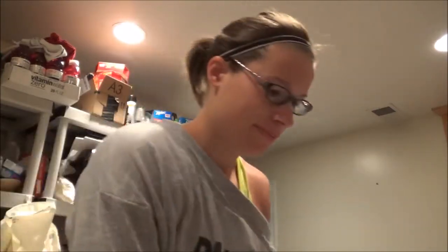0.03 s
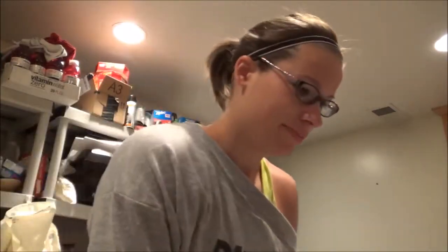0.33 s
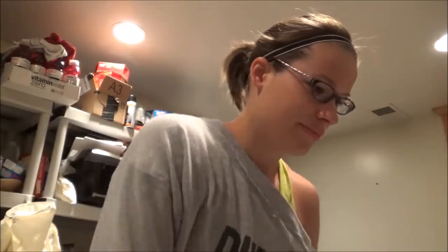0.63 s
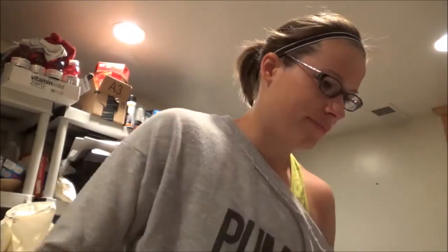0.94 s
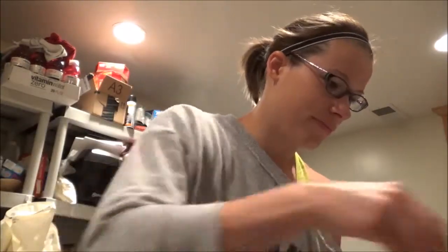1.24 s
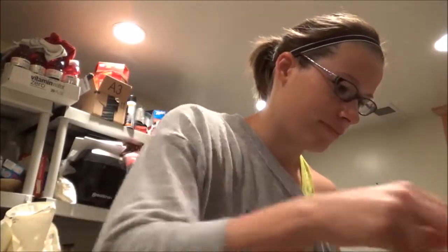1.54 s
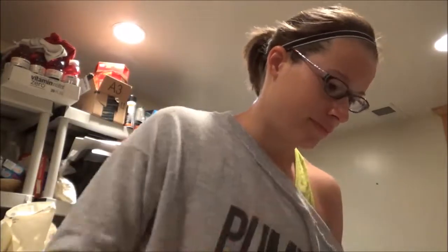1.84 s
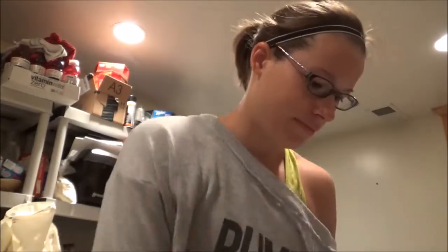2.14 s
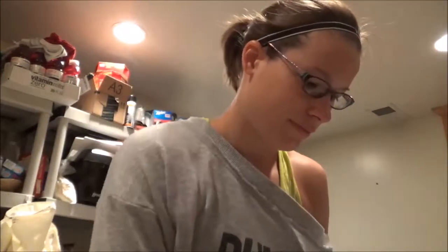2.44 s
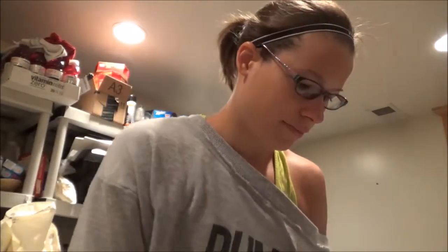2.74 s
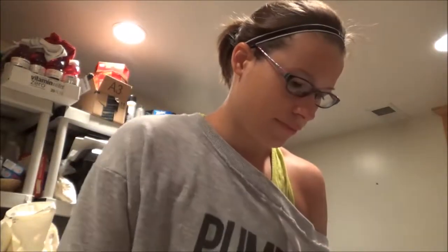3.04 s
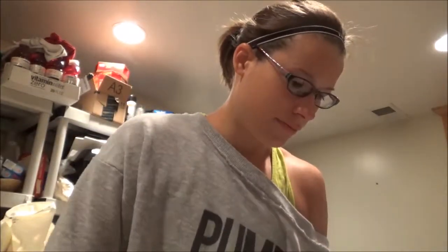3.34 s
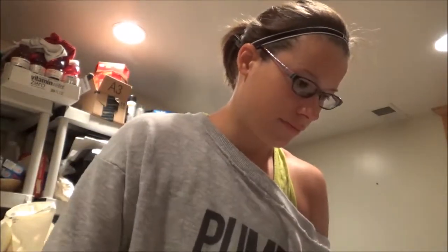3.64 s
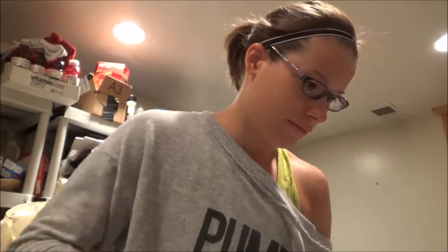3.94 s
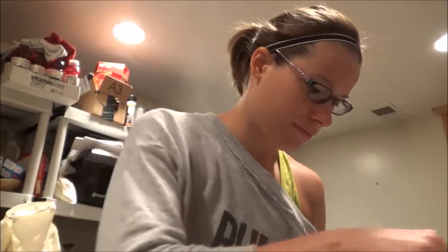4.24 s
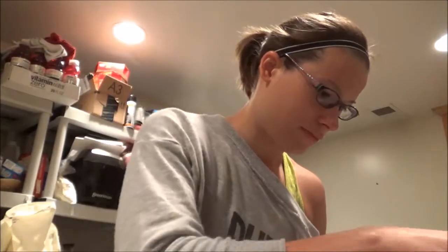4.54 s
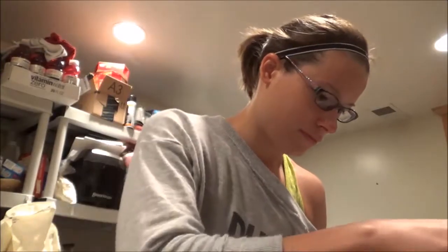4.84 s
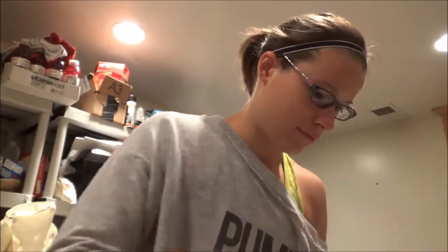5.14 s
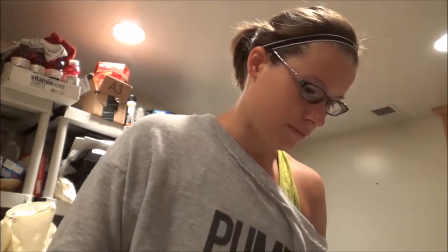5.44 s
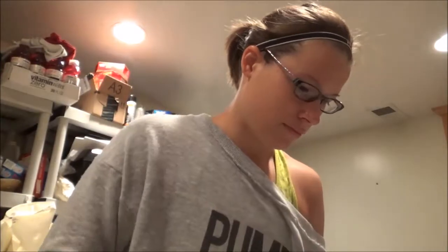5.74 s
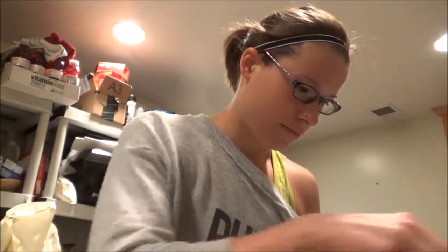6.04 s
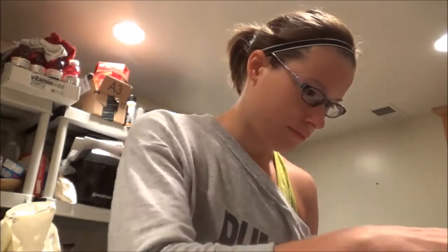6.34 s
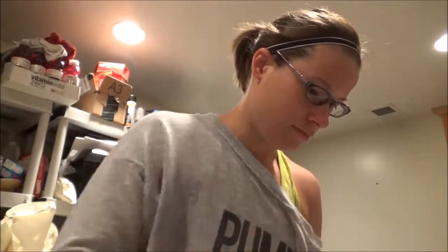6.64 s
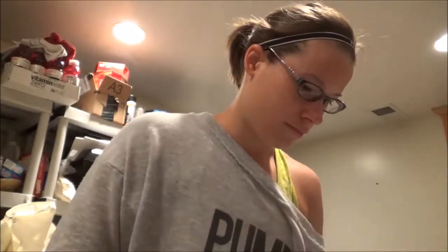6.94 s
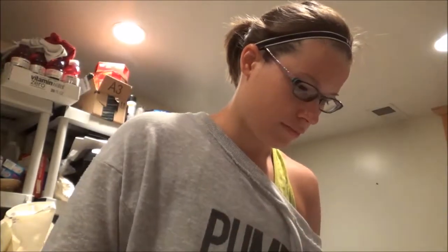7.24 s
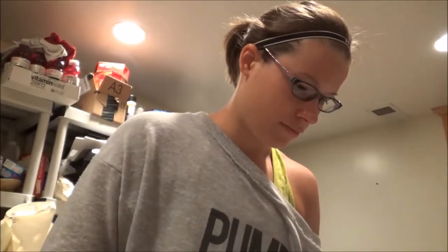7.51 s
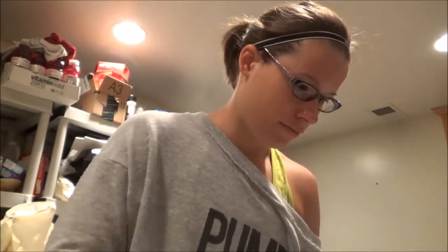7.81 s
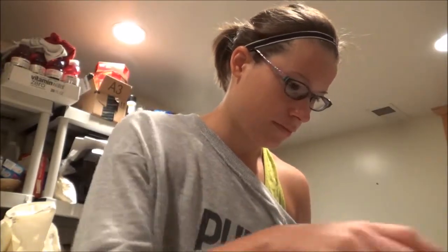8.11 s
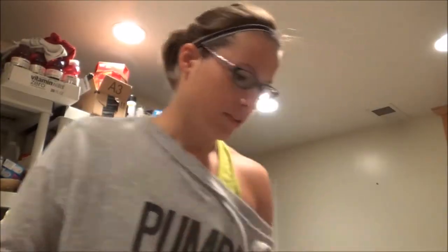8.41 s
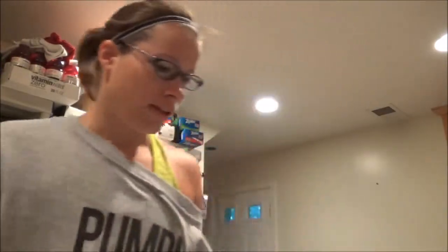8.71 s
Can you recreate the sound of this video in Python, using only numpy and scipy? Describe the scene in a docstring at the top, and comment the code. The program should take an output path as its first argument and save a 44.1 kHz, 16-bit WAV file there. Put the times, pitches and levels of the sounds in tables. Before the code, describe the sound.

Over the steady low hum of a small kitchen, someone handles a plastic bag close by in two bursts of sharp crinkling, with a short patter of hard pieces landing in a spoon between them. A quieter stretch follows with only scattered, dry ticks of single pieces falling. At the end the bag rustles up again. Counter and walls add a short echo.

```python
"""Chocolate chips are shaken from a plastic bag into a measuring spoon in a small, humming kitchen.
First the bag crinkles close by, its creases snapping over a bed of tiny crackles; then a few chips tick
and bounce. Near 2 s the bag is gripped hard again and film hisses over film, with a few soft bumps.
From 4 s stray chips drop, and just after 8 s the bag crackles as it is picked up again.
Counter and walls add a short echo to the handling."""
import sys
import numpy as np
from scipy import signal
from scipy.fft import rfft, irfft, next_fast_len
from scipy.io import wavfile

SR = 44100
rng = np.random.default_rng(int(sys.argv[2]) if len(sys.argv) > 2 else 0)


def persist_wave(psi):
    """Save psi, clipped to +-1, as 16-bit WAV."""
    counts = np.round(np.clip(psi, -1, 1) * 32767).astype(np.int16)
    wavfile.write(sys.argv[1], SR, np.atleast_2d(counts).T)


N = 391166
TIME, HIT_TIME = np.arange(N) / SR, np.arange(6144) / SR  # clocks of the scene and of one hit
BODY_HZ, MIDDLE_HZ, TREBLE_HZ = (315, 977), (963, 3960), (3730, 10780)  # the three bands of a hit
LIFT_S = 8.6  # from here on the bag is held up and sounds thinner

# strokes of film sliding over film: start/s, length/s, level/dB
SLIDE_STROKES = [(0.393, 0.049, -44), (0.496, .29, -48.5), (0.848, 0.062, -53), (1.867, 0.056, -43),
                 (2.658, 0.27, -49), (3.071, .11, -50.5), (3.163, 0.21, -55), (3.473, 0.18, -63.5),
                 (3.632, 0.2, -56), (3.742, 0.041, -50.5), (8.385, 0.3, -52), (8.651, 0.23, -47.5)]


def undb(db):
    """Decibels to gain."""
    return 10 ** (np.asarray(db) / 20)


def unit(x):
    """Scale to rms 1."""
    return x / np.sqrt(np.mean(x ** 2))


def band(x, lo_hz, hi_hz, order=2):
    """Causal band-pass."""
    return signal.sosfilt(signal.butter(order, [lo_hz, hi_hz], "band", fs=SR, output="sos"), x)


def spectrum(points, hz):
    """Gain at hz of a curve of (f/Hz, level/dB) points."""
    f, db = np.transpose(points)
    return undb(np.interp(np.log(hz + 1), np.log(f), db))


def noise(gain):
    """Noise of rms 1 whose spectrum is gain(hz)."""
    size = next_fast_len(N)
    hz = np.arange(size // 2 + 1) * SR / size
    return unit(irfft(rfft(rng.standard_normal(size)) * gain(hz), size)[:N])


def add(track, s, x):
    """Mix x into the track at time s."""
    i = int(np.clip(s * SR, 0, N - 1))
    track[i:i + len(x)] += x[:N - i]


def fade(t60):
    """Exponential decay of one hit."""
    return undb(-60 * HIT_TIME / t60)


def ring(hz, t60):
    """One struck mode."""
    return np.sin(2 * np.pi * hz * HIT_TIME) * fade(t60)


def crack(edges_hz, t60, focus_hz=None, focus=2.2, rise_s=0.00028):
    """Crowded, damped modes of one band, strongest near focus_hz; rms near 1 over the first 4 ms."""
    shape = fade(t60) * (1 - np.exp(-HIT_TIME / rise_s))  # soft material takes a moment to give way
    burst = band(rng.standard_normal(len(shape)) * shape, *edges_hz, order=3)
    if focus_hz:
        burst = burst + focus * signal.lfilter(*signal.iirpeak(focus_hz, 2.6, fs=SR), burst)
    return unit(burst) * np.sqrt(np.mean(shape ** 2) / np.mean(shape[:SR // 250] ** 2))


def pop(hz, t60, tone, hold):
    """A small panel flexes once: one heavily damped tone amid a crack of other modes."""
    mode = ring(hz * (1 + 0.01 * rng.standard_normal()), t60 * hold)
    mode /= np.sqrt(np.mean(mode[:SR // 250] ** 2))
    return (tone * band(mode, *MIDDLE_HZ) + crack(MIDDLE_HZ, t60, hz, focus=2.0)) / np.hypot(tone, 1)


def appliances(air_db=-58, side_db=-14, waver=0.35):
    """Room tone: fan air, droning resonances and a wavering motor; only the air has stereo width."""
    # colour of the fan air: f/Hz, relative density/dB
    air_colour = [(15, -36), (27, -23), (55, -3), (110, -5), (200, -9), (250, -11), (330, -5), (430, -12),
                  (560, -16), (750, -19.5), (1060, -22), (1500, -28), (3000, -32.5), (9000, -38.5),
                  (11000, -39.5)]
    # room resonances that the appliances keep going: f/Hz, width/Hz, level/dB
    room_modes = [(34.2, 3, -71), (138.2, 9.2, -59), (174.6, 3.3, -68.5), (297, 11.8, -65),
                  (353.3, 4.3, -64), (476.3, 20, -69), (1035, 30, -81)]
    # course of the low motor hum: t/s, f/Hz, level/dB
    motor_course = [(0, 88.8, -58), (1, 87.8, -60), (3, 85.7, -61), (4.3, 85, -66.5), (5.3, 79.5, -82),
                    (5.9, 79.3, -65), (7.3, 79.1, -68), (8.87, 79.2, -62)]
    air = noise(lambda f: spectrum(air_colour, f))
    side = undb(side_db) * noise(lambda f: spectrum(air_colour, f) * np.clip(f / 1500, .11, 1))
    drone = sum(undb(db) * noise(lambda f: 1 / (1 + ((f - hz) / width) ** 2))
                for hz, width, db in room_modes)
    s, motor_hz, motor_db = np.transpose(motor_course)
    phase = 2 * np.pi * np.cumsum(np.interp(TIME, s, motor_hz)) / SR
    sway = 1 + waver * noise(lambda f: 1 / (1 + (f / 5) ** 2))
    hum = np.sqrt(2) * undb(np.interp(TIME, s, motor_db)) * sway * np.sin(phase)
    return drone + hum + undb(air_db) * (air + np.array([[1], [-1]]) * side)


def bumps(push_s=0.0038):
    """A soft contact swells for a moment and leaves one dull tone; the lowest booms on in the room."""
    # bumps of the bag and its load: t/s, level/dB, f/Hz, t60/s
    contacts = [(.226, -34, 726, 0.11), (1.947, -32, 495, 0.029), (3.248, -31, 510, 0.018),
                (3.413, -39.5, 466, 0.035), (3.473, -43, 580, 0.068), (3.852, -28.5, 556, 0.023),
                (3.84, -51.5, 136.4, 0.61)]
    swell = 1 - np.exp(-HIT_TIME / push_s)
    out = np.zeros(N)
    for s, db, hz, t60 in contacts:
        add(out, s, 2 * undb(db) * swell * ring(hz, t60))
    return out


def chips(t60=0.026, knock_db=-2.5):
    """Each chip gives a dry two-toned knock and rings the spoon's dish, depending on where it lands."""
    # chips landing: t/s, level/dB, relative treble/dB, knock f/Hz, relative dish ring/dB
    landings = [(1.2607, -45.5, -16, 1950, -45), (1.311, -54, 1.5, 1950, -45), (1.3876, -45, -2, 3600, -14),
                (1.3993, -37.5, 3, 3820, -15), (1.4065, -45, 8, 3500, -8), (1.4141, -42.5, 4.5, 1920, -20),
                (1.462, -47.5, -1, 3540, -6), (1.508, -60, 6.5, 2100, 8), (3.9648, -46, -3.5, 1600, -21),
                (4.339, -46.5, 3.5, 2300, -45), (4.5974, -44.5, 5.5, 1790, -45),
                (4.6003, -46.5, 5, 1870, -45), (5.356, -45, 0, 2200, -45), (5.3699, -41.5, -4.5, 2330, -45),
                (5.371, -45, -6, 1190, -45), (6.2976, -58, -1.5, 1970, -45), (6.8976, -54.5, 3, 1900, -45),
                (6.9166, -60.5, 5.5, 2030, -43), (7.816, -55.5, 4.5, 2000, -45),
                (7.8698, -58.5, 2, 2580, -45), (8.156, -51, -18, 1710, -44)]
    # modes of the dish: f/Hz, level/dB, t60/s
    dish_modes = [(2120, -3, 0.085), (2630, -5, 0.03), (3560, 3, 0.04), (5530, 5.5, 0.043),
                  (8300, -8, 0.043)]
    out = np.zeros(N)
    for s, db, treble_db, hz, ring_db in landings:
        knock = pop(hz, t60, tone=0.6, hold=0.6) + undb(-1) * ring(hz * 0.498, t60)
        knock += undb(-4) * crack(BODY_HZ, t60) + undb(treble_db) * crack(TREBLE_HZ, t60)
        dish = sum(undb(mode_db + 2 * rng.standard_normal()) * ring(mode_hz, mode_t60)
                   for mode_hz, mode_db, mode_t60 in dish_modes)
        add(out, s, undb(db) * (undb(knock_db) * knock + undb(ring_db) * dish))
    return out


def crumpling(swell=0.57):
    """How hard the film is worked: it crumples under each grip, then settles."""
    # the hand grips the bag: start/s, attack/s, level/dB, t60/s
    grips = [(0, 0.0017, -41, 0.63), (.15, 0.045, -43, 1.97), (.36, 0.075, -44.5, 0.12),
             (1.862, 0.11, -38.5, 0.24), (2.03, 0.043, -47, 1.26), (2.15, 0.029, -40, .25),
             (2.24, 0.032, -44.5, 2.4), (3.44, 0.024, -56.5, 0.65), (8.3, 0.66, -52, 3.3)]
    power = 1e-12
    for s, attack_s, db, t60 in grips:
        rise = np.clip((TIME - s) / attack_s, 0, 1) ** swell
        settle = undb(-60 * np.maximum(TIME - s - attack_s, 0) / t60)
        power = power + (undb(db) * rise * settle) ** 2
    return np.sqrt(power)


def sliding(edge_s=0.028):
    """How fast the film slides: each stroke starts, holds and stops."""
    return sum(undb(db) * np.clip(np.minimum(TIME - s, s + length - TIME) / edge_s, 0, 1)
               for s, length, db in SLIDE_STROKES)


def catches(per_stroke=8, level_db=-7, spread_db=2, t60=0.012, edge_hz=7500, octaves=0.74):
    """While it slides, the film catches now and then and lets go with a tiny bright tick."""
    out = np.zeros(N)
    for s, length, db in SLIDE_STROKES:
        for when, size, pitch in rng.random((per_stroke, 3)):
            size_db = -spread_db * np.log(1 - .97 * size)  # many weak ones, few strong
            tick = crack(TREBLE_HZ, t60, edge_hz * 2 ** (octaves * (2 * pitch - 1)))
            add(out, s + when * length, undb(db + level_db + size_db) * tick)
    return out


def rustle(per_s=700, spread_db=3, grain_s=0.0022, octaves=0.92, treble_db=-2.5, slide_body_db=-8,
           lifted_db=-6, lifting_s=0.53):
    """Tiny wrinkles give way at random, each with its own size and pitch; sliding film adds hiss."""
    # colour of the film's crackle: f/Hz, relative density/dB
    film_colour = [(100, 12), (200, 1.5), (320, 6), (520, 8), (780, 2.5), (1300, 4.5), (2200, -2),
                   (3500, -5.5), (5500, -9.5), (8500, -3), (12000, -40)]
    work, speed = crumpling(), sliding()
    centres_hz = 140 * 2 ** (np.arange(14) / 2)  # half-octave bands
    weights = spectrum(film_colour, centres_hz) * np.sqrt(centres_hz)
    weights /= np.linalg.norm(weights[6:10])  # the middle bands set the level
    when, size, pitch = rng.random((int(per_s * N / SR), 3)).T
    strength = undb(-spread_db * np.log(1 - .995 * size))
    wrinkle_hz = centres_hz[0] * (centres_hz[-1] / centres_hz[0]) ** pitch
    lift = np.clip((TIME - LIFT_S) / lifting_s + 1, 0, 1)
    out = np.zeros(N)
    for hz, weight in zip(centres_hz, weights):
        high = np.clip(np.log2(hz / 2600), 0, 1)  # 0 in the lows and mids, 1 in the treble
        share = np.exp(-(np.log2(hz / wrinkle_hz) / octaves) ** 2)
        kicks = np.bincount((when * N).astype(int), strength ** 2 * share, N)
        power = signal.lfilter([1], [1, -np.exp(-1 / (grain_s * SR))], kicks + 1e-12)
        power += high * power.mean()  # even hiss fills the gaps in the treble
        grains = np.sqrt(power) * rng.standard_normal(N)
        grains = unit(band(grains, hz / 2 ** .25, hz * 2 ** .25))
        if hz < BODY_HZ[1]:  # the bag loses body as it is lifted
            grains *= undb(lifted_db * lift)
        envelope = np.hypot(work * undb(treble_db * high), speed * undb(slide_body_db * (1 - high)))
        out += weight * grains * envelope
    return out * undb(0)


def small_creases(count=130, level_db=-4, spread_db=4, centre_hz=1750, octaves=0.4):
    """Lesser creases give way at random, as strongly as the bag is worked; rows for creases()."""
    jitter, size, bright, pitch = rng.random((count, 4)).T
    sample = (np.arange(count) + jitter) / count * (N - 1)
    size_db = -spread_db * np.log(1 - .97 * size)
    db = 20 * np.log10(crumpling()[sample.astype(int)]) + level_db + size_db
    treble_db = -7 + 6 * (2 * bright - 1)
    hz = centre_hz * 2 ** (octaves * (2 * pitch - 1))
    return list(zip(sample / SR, db, treble_db, hz))


def snap(db, treble_db, hz, lifted, t60=0.02, hard_db=-38, thinning=0.48, lifted_db=-6.5):
    """A crease flips and the panel of film beside it rings; lows last longest, hard snaps are thinner."""
    tone = 0.5 * undb(-0.31 * treble_db)  # dull creases belong to slack panels, with a clearer note
    middle = undb(-2) * pop(hz, t60, tone, hold=0.33)
    body_db = -9 - thinning * np.clip(db - hard_db, -10, 20) + lifted_db * lifted
    body = undb(body_db) * crack(BODY_HZ, 2 * t60)
    edge_hz = np.clip(6300 * 2 ** (treble_db / 22), 4500, 9200)  # tight, bright creases ring higher
    edge = undb(treble_db - 1) * crack(TREBLE_HZ, 0.63 * t60, edge_hz, focus=4.2)
    return undb(db) * (body + middle + edge)


def creases(longest_wait_s=0.008, second_db=-8, second_octaves=0.27):
    """Every crease snaps, and a neighbouring panel of another size follows a moment later."""
    # the bag's main creases snapping through: t/s, level/dB, relative treble/dB, film ring f/Hz
    main_creases = [(0.0624, -37, -21, 1170), (0.094, -27, -11, 2160), (0.1552, -35.5, -4, 1230),
                    (0.187, -32.5, -10, 1250), (0.2235, -24, -6.5, 1880), (0.2296, -33, -14, 1400),
                    (0.25, -31, -19, 2460), (0.3017, -35, -15, 2490), (0.3401, -32, -3, 1720),
                    (0.522, -43, -9, 1340), (0.5415, -37, -10, 1750), (0.685, -59.5, 14.5, 1380),
                    (0.843, -48.5, -12, 1090), (0.9325, -53, -11, 2840), (1.0114, -46.5, -19, 1050),
                    (1.869, -50, 0, 1160), (1.887, -32, 0, 2580), (1.927, -28, -4, 1270),
                    (1.9342, -23.5, -2.5, 1750), (1.9396, -23.5, -3.5, 1050), (1.9775, -26, -7, 1960),
                    (1.9969, -27.5, -8, 1920), (2.0096, -29, -6, 2260), (2.0202, -29.5, -16, 1970),
                    (2.0642, -40.5, -6, 1970), (2.1076, -44, -5, 1210), (2.159, -27.5, -18, 1190),
                    (2.1706, -24.5, -6.5, 2440), (2.2204, -31, -4, 1280), (2.253, -21, -10.5, 1400),
                    (2.262, -31.5, 2.5, 1380), (2.3069, -31, -6.5, 1750), (2.3453, -31, -9.5, 2380),
                    (2.5133, -57, -18, 1430), (2.58, -55.5, 7, 1540), (2.665, -35, -28, 2060),
                    (2.842, -35.5, -8, 1780), (2.9121, -42.5, -27, 2050), (2.95, -47.5, -4, 2120),
                    (3.0324, -48, 8, 1190), (3.086, -44, -24, 1670), (3.155, -56, 8, 1130),
                    (3.214, -51, 13.5, 1200), (3.2467, -39, -32, 1510), (3.4509, -41, -22, 1730),
                    (3.4648, -54.5, 17, 1240), (3.647, -37, -14.5, 1880), (3.7052, -33, -14.5, 1980),
                    (3.7988, -44.5, -5.5, 2420), (8.2188, -52, -3.5, 1220), (8.2743, -45, -5.5, 1250),
                    (8.36, -52.5, 3, 2380), (8.377, -61, 12.5, 1133), (8.448, -44.5, -10, 1310),
                    (8.563, -30, -10, 1150), (8.6258, -33, -18, 2010), (8.631, -34.5, -5, 1150),
                    (8.6696, -29.5, -7, 2220), (8.7036, -27.5, -9, 1380), (8.7234, -33.5, -7, 2390),
                    (8.7575, -29, -12, 1330), (8.789, -30.5, -4.5, 1940), (8.815, -35.5, -4, 1910),
                    (8.8263, -24.5, -17, 2080)]
    out = np.zeros(N)
    for s, db, treble_db, hz in main_creases + small_creases():
        wait, shift = rng.uniform(.3, 1), rng.uniform(-1, 1)
        lifted = s > LIFT_S
        add(out, s, snap(db, treble_db, hz, lifted))
        second = snap(db, treble_db, hz * 2 ** (second_octaves * shift), lifted)
        add(out, s + wait * longest_wait_s, undb(second_db) * second)
    return out


def reflections(early_db=-12.5, early_t60=0.074, late_db=-10, low_t60=0.28, high_t60=0.31):
    """The room's answer at one spot: quick slaps off counter and shelves, then a short diffuse tail."""
    t = np.arange(SR // 2) / SR
    arrival = np.clip((t - .002) / 0.0018, 0, 1)
    early, low, high = rng.standard_normal((3, len(t)))
    early *= undb(-60 * t / early_t60)
    late = band(low, 150, 2500, order=1) * undb(-60 * t / low_t60)
    late += band(high, 2500, 13000, order=1) * undb(-60 * t / high_t60)
    response = undb(early_db) * unit(early * arrival) + undb(late_db) * unit(late * arrival)
    return response / np.sqrt(len(t))


def echo(x, spots=3, move_s=0.23):
    """The hands move, so the sound crossfades from one set of reflections to the next."""
    away = (TIME / move_s - np.arange(spots)[:, None] + 1) % spots - 1
    shares = np.cos(np.pi / 2 * np.minimum(np.abs(away), 1))
    return sum(signal.oaconvolve(x * share, reflections())[:N] for share in shares)


def kitchen(x, width=0.72, wide_hz=650):
    """Direct sound plus stereo echo; long waves reach both microphones alike, so the lows stay centred."""
    side = width * band(echo(x), wide_hz, 10000, order=1)
    return x + echo(x) + side * np.array([[1], [-1]])


def scene():
    """Bag and chips in the kitchen, over its hum."""
    return kitchen(creases() + rustle() + catches() + chips() + bumps()) + appliances()


def record(dry, port_hz=8500, port_q=5.4, port_mix_db=-3.5, low_cut_hz=20, top_hz=11050):
    """The microphone port lifts a narrow band of treble; deep bass and the top octave are cut steeply."""
    presence = signal.lfilter(*signal.iirpeak(port_hz, port_q, fs=SR), dry)
    bright = dry + undb(port_mix_db) * presence
    thin = signal.sosfilt(signal.butter(4, low_cut_hz, "high", fs=SR, output="sos"), bright)
    return signal.sosfilt(signal.ellip(10, .3, 60, top_hz, fs=SR, output="sos"), thin)


dry = scene()
out = record(dry)
persist_wave(out)
```